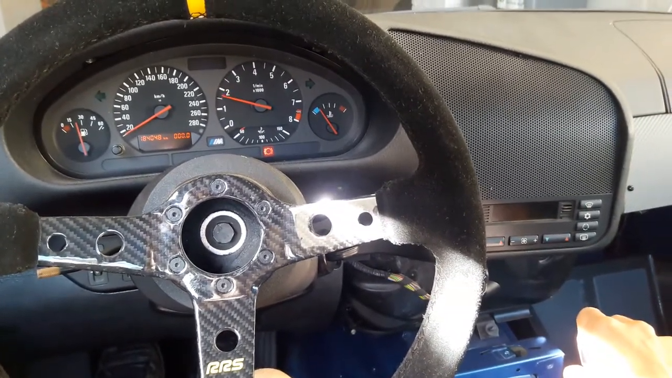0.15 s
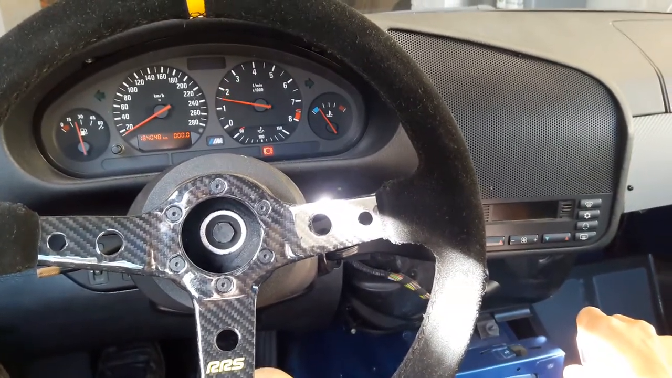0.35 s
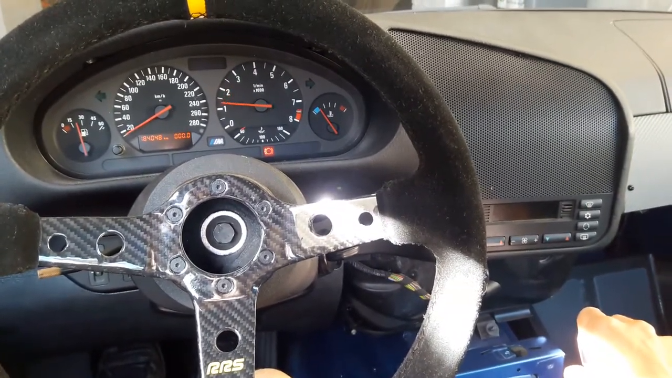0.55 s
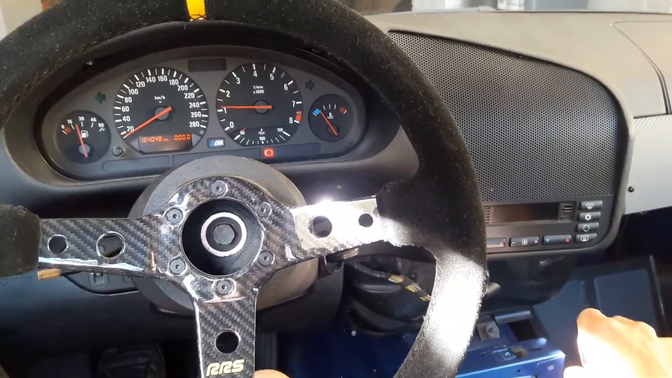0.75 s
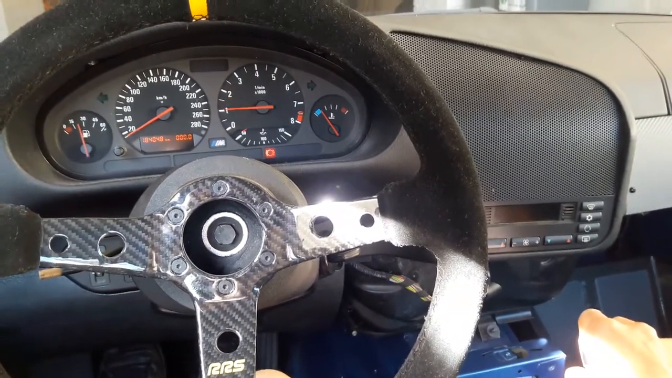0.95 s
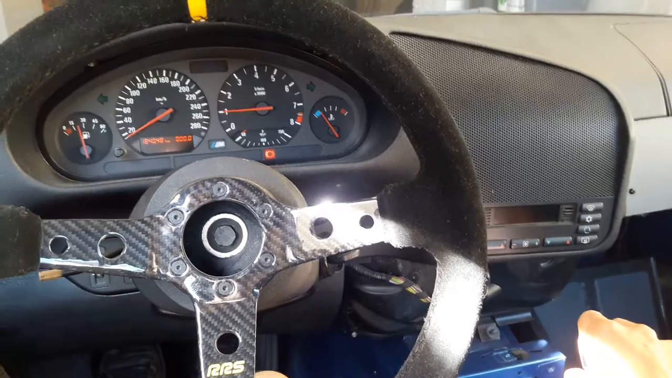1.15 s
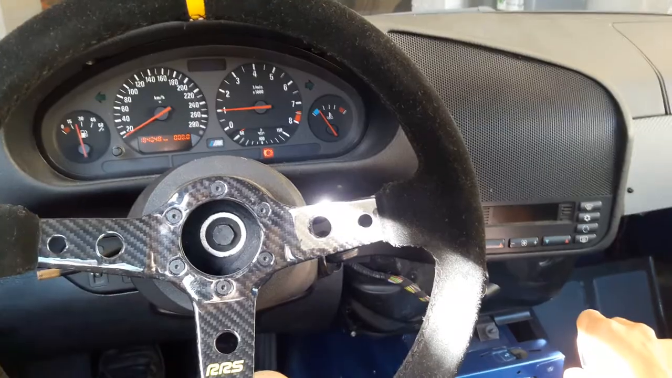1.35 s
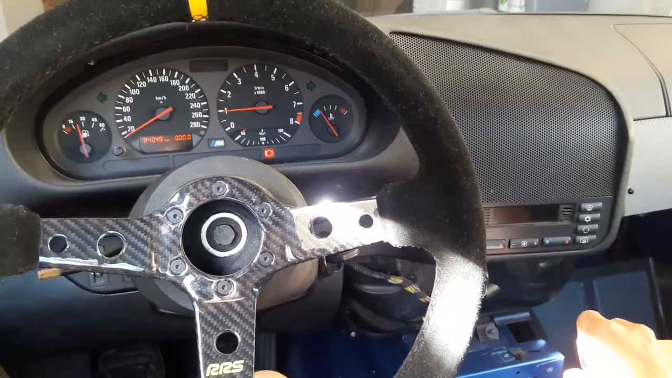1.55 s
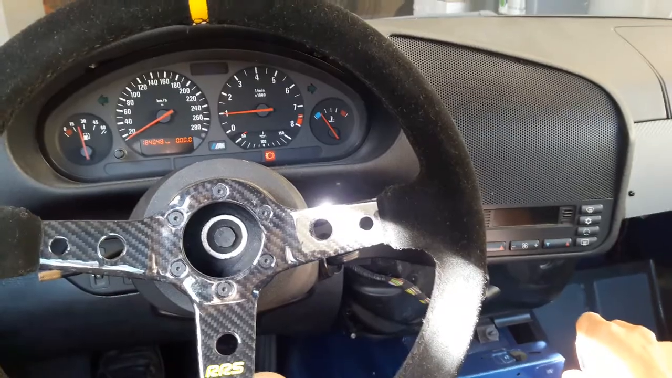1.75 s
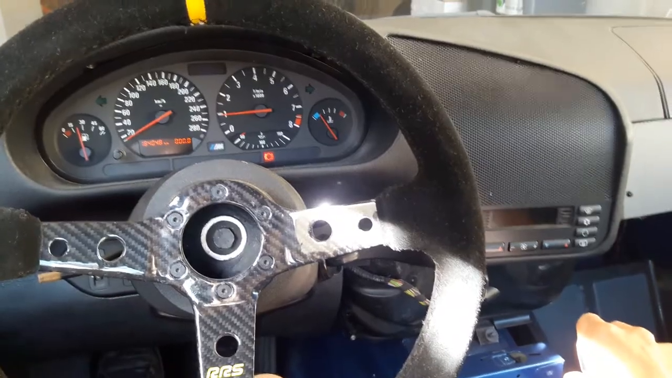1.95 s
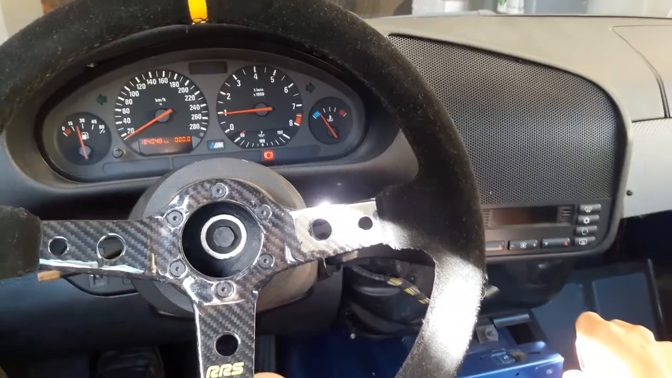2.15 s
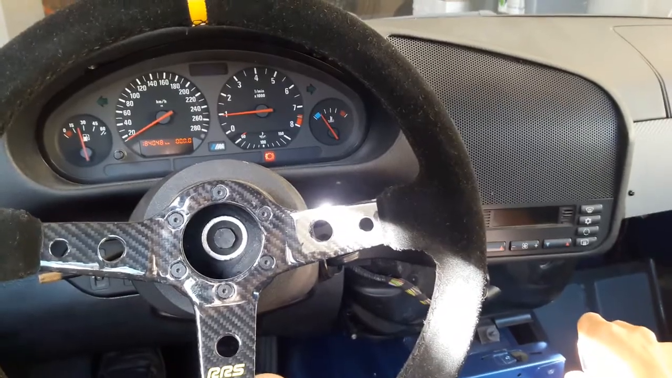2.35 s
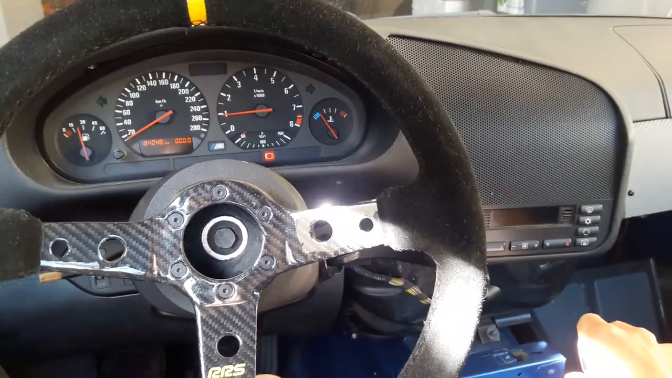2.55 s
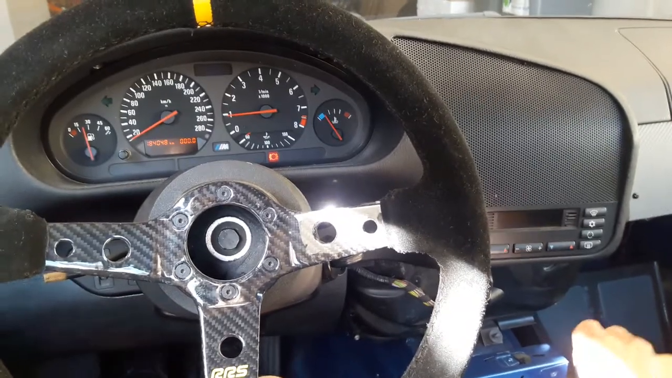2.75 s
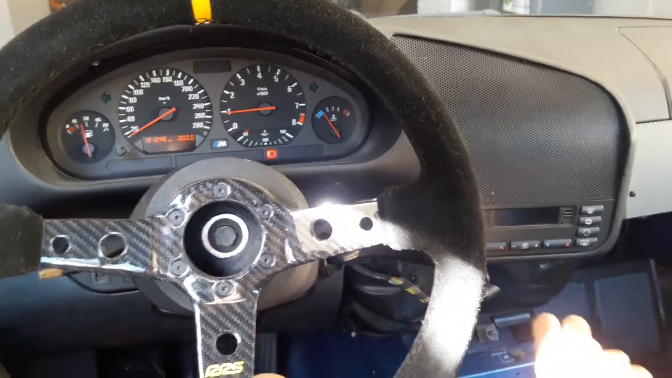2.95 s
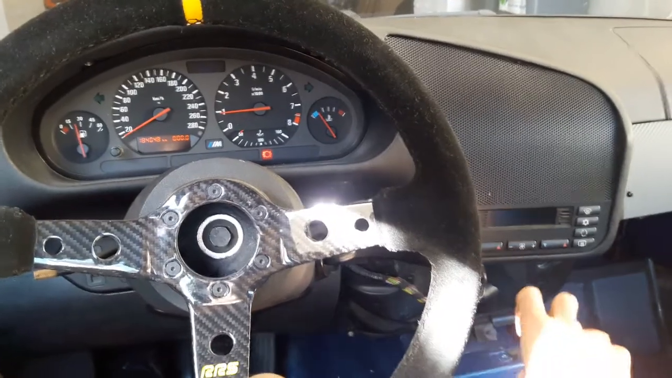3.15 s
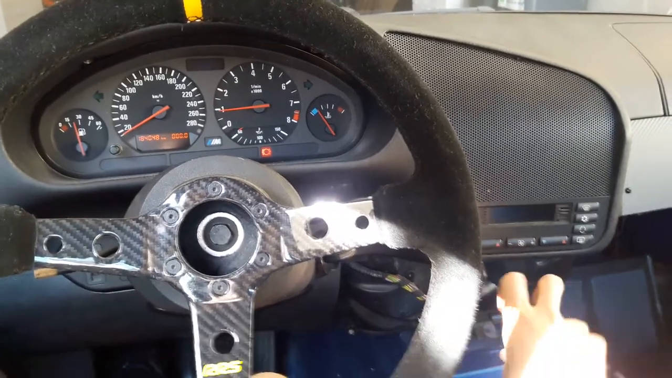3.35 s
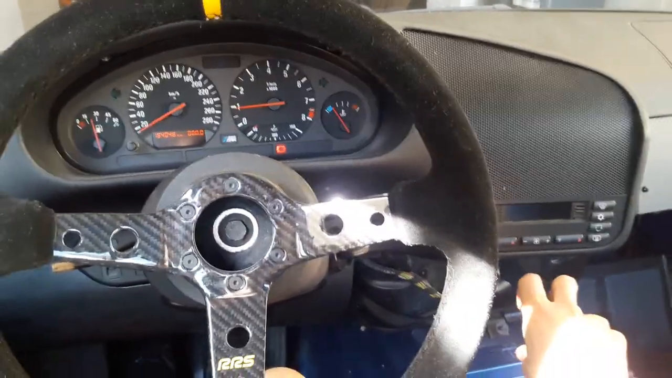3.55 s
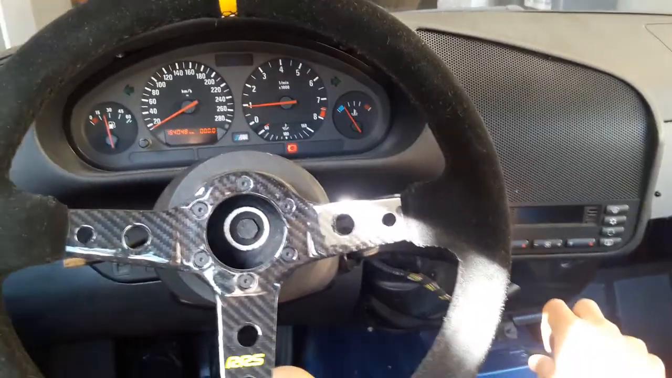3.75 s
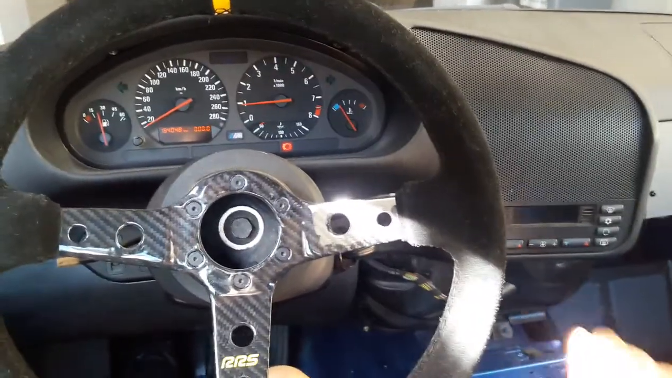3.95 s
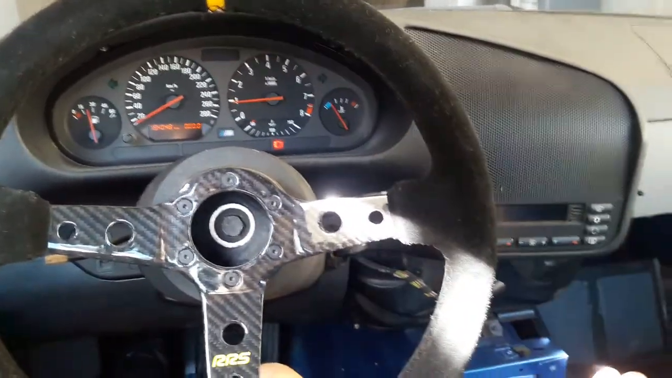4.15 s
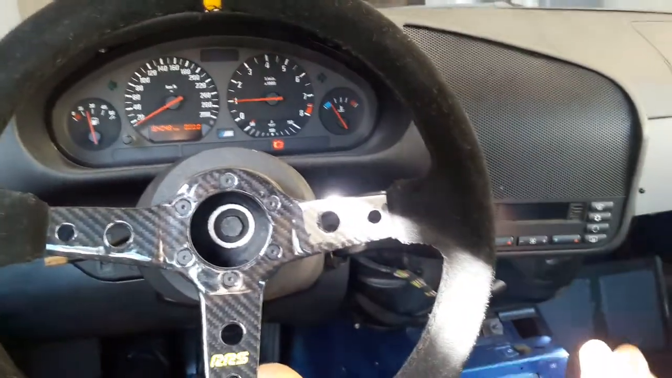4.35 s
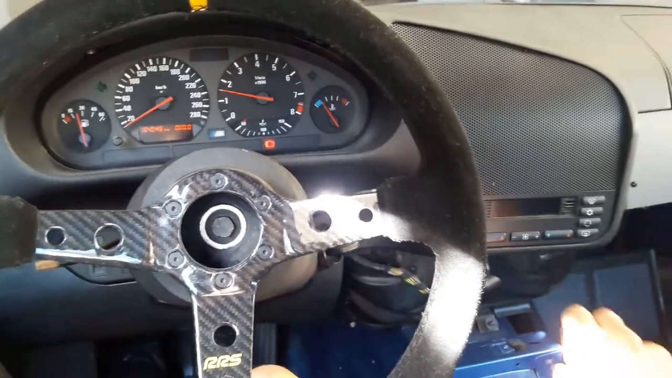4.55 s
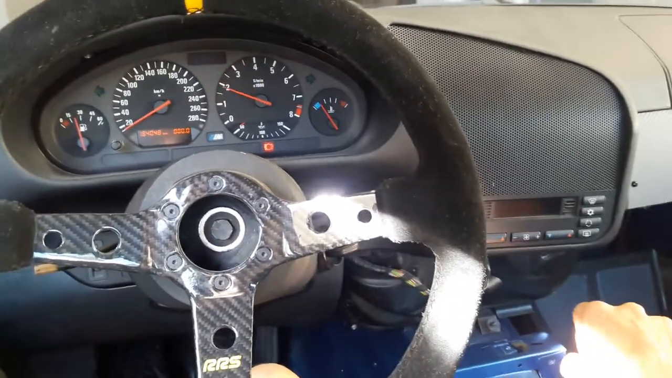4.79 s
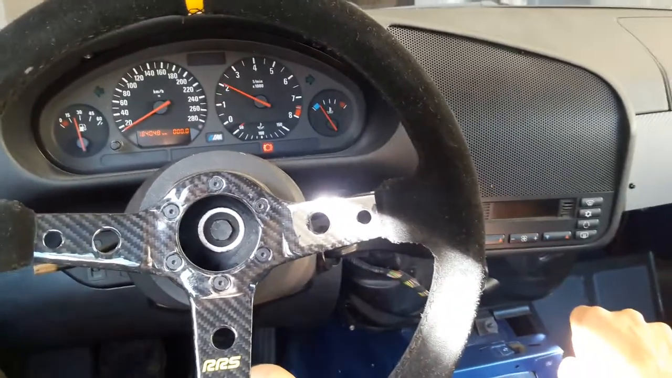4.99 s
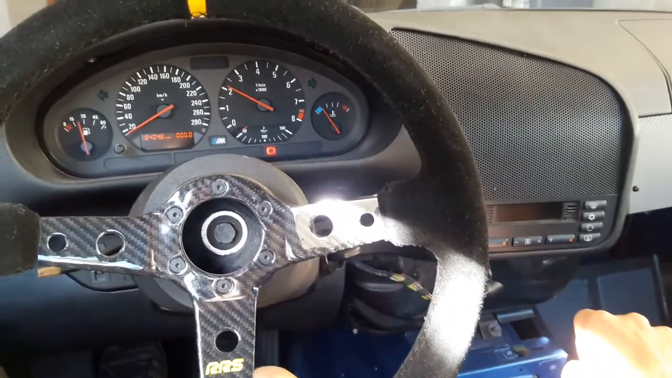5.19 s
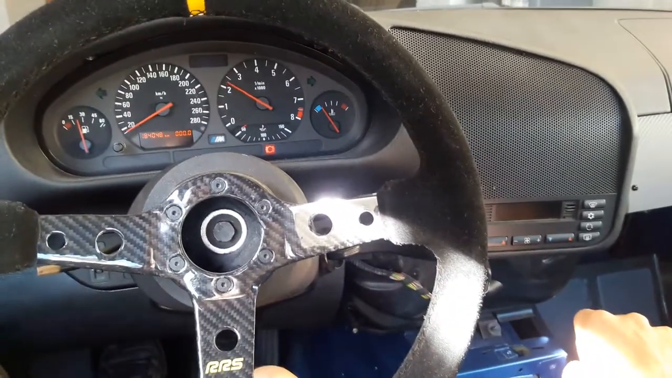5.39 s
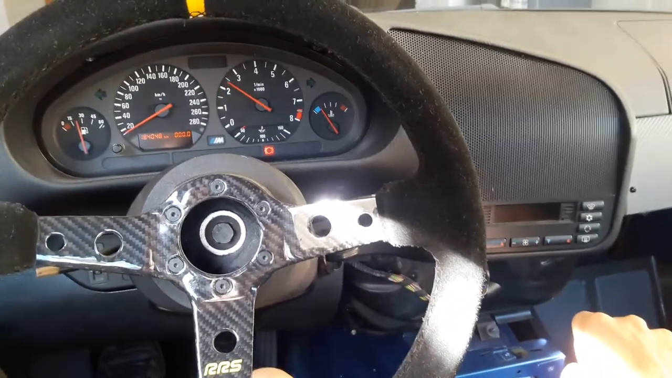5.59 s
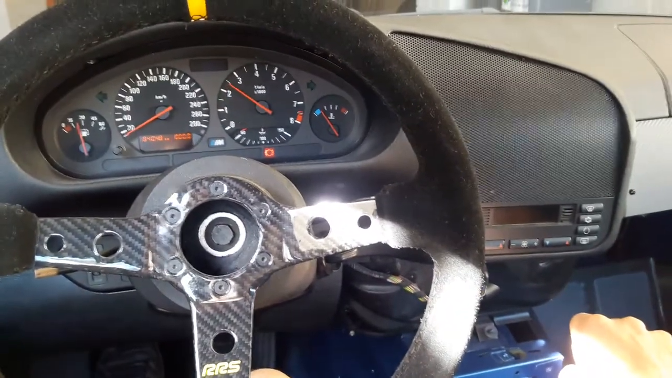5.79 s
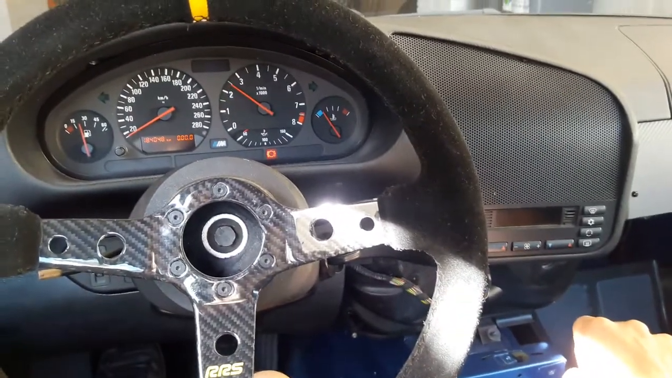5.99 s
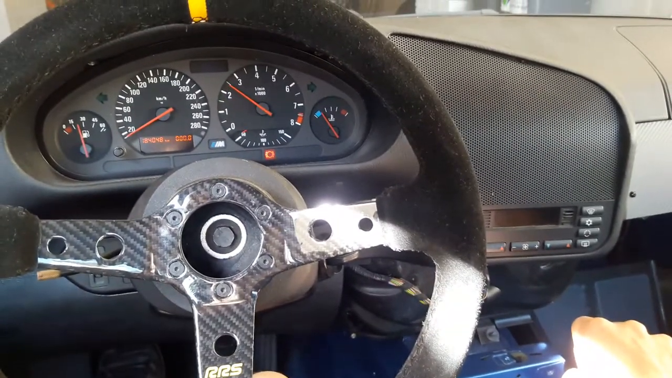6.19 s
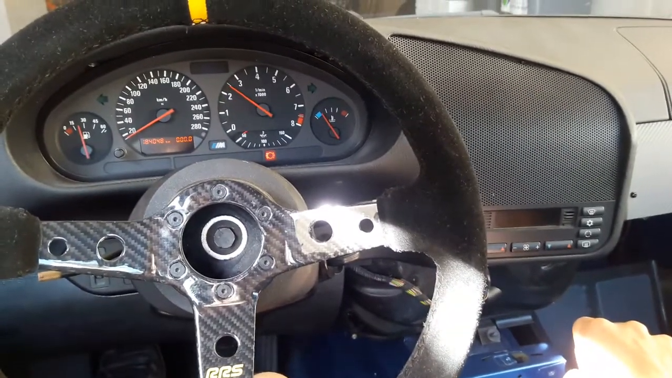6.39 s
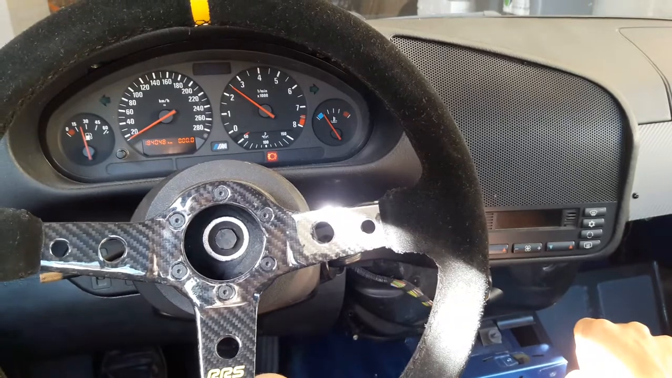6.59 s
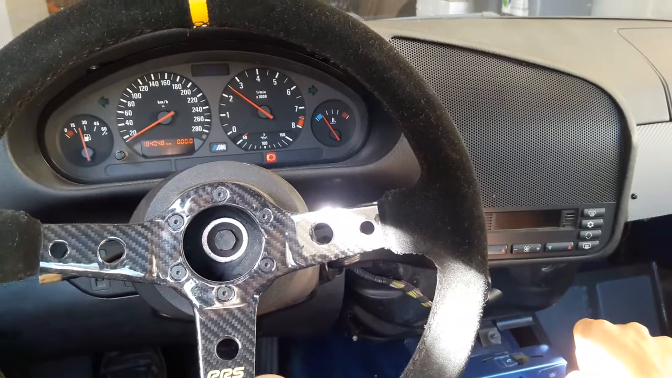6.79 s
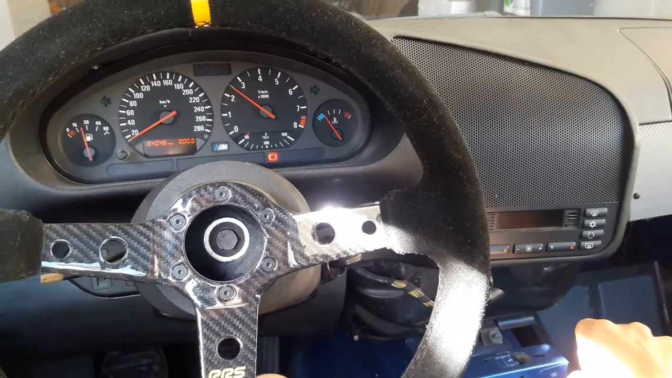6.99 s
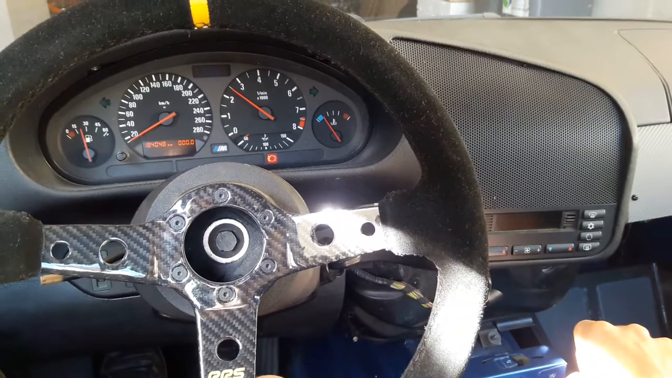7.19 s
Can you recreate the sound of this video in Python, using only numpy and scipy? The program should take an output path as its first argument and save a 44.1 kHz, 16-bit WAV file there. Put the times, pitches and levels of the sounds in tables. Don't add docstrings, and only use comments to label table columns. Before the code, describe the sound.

Heard from the driver's seat in a small, boomy cabin with a close stereo microphone. From 0 to about 0.8 seconds a six-cylinder petrol engine falls in revs, shuddering and missing beats, with low thumps ringing the floor pan. From 1 to 4.2 seconds it idles slowly, about 48 firings a second, lumpy and deep, with muffled rumble, clatter and a faint hissing puff each cycle from beyond the bulkhead, and thin gear and chain whine. Gear lever ticks come at 2.8 to 2.9, a heavy double clunk at 3.4, a light knock at 3.8 and a sharp click with clunk at 4.15. At 4.2 air gulps in, hard firings pound the floor and the revs climb steeply until 5, with small knocks and buzzes. They ease up to a loud, booming, slightly rough drone, nearly 130 firings a second, with brighter clatter and whine, held until 7.2 seconds.

```python
import sys
import numpy as np
from scipy import signal
from scipy.fft import rfft, irfft, next_fast_len
from scipy.io import wavfile
from scipy.ndimage import uniform_filter1d

SR = 44100
rng = np.random.default_rng(int(sys.argv[2]) if len(sys.argv) > 2 else 0)


def unload_wav(signal):
    wavfile.write(
        sys.argv[1],
        SR,
        np.round(np.clip(np.atleast_2d(signal).T, -1, 1) * 32767).astype(np.int16),
    )


def volts_from_db(level):
    exponent = np.asarray(level, float) / 20
    return 10 ** exponent


N = 318843

# t/s, effort over a resting idle/dB, extra unevenness between cylinders/dB
BURN = [(0, 4, 4.5), (.25, 7, -1.3), (.55, 3.5, 4), (.8, 3, 1.5), (1.6, 1.5, 0), (2.8, 1.7, -2.2),
        (3.6, -1.3, 6), (4.15, 0.5, 4), (4.3, 6.5, 0.5), (4.5, 8, -1), (4.6, 16.5, -3), (5.1, 16.5, -3),
        (5.35, 15, -0.1), (6.0, 14, 2), (6.4, 17, -4), (7.0, 14.5, -2.1), (7.23, 14.5, 1.5)]
HALF = np.array([[1], [-1]]) / 2


def unit(x):
    return x / np.sqrt(np.mean(x ** 2) + 1e-20)


def along(points, hz):
    f, v = np.transpose(points)
    return np.interp(np.log(hz + 1), np.log(f + 1), v)


def curves(rows):
    s, *cols = np.transpose(rows)
    return [np.interp(np.arange(N) / SR, s, c) for c in cols]


def wobble(rate, size=1):
    knots = rng.standard_normal(int(N * 40 / SR) + 4)
    return np.interp(np.arange(0, N, size) * min(rate, 40) / SR, np.arange(len(knots)), knots)


def span(start, end, edge):
    t = np.arange(N) / SR
    return np.clip(np.minimum(t - start, end - t) / edge + .5, 0, 1)


def filtered(x, response):
    m = 2 * next_fast_len(N // 2 + SR // 2)
    return irfft(rfft(x, m) * response(np.fft.rfftfreq(m, 1 / SR)), m)[..., :N]


def rush(spectrum, patchy_db):
    # f/Hz, likeness of the two ports (0-1)
    alike = [(100, 1), (250, 0.4), (400, 0.5), (700, 0.02), (1300, 0.74), (2000, 0.14), (3000, .12),
             (10000, 0.02)]
    # f/Hz, phase by which the left port leads/rad
    lead = [(0, 0), (860, -0.2), (1380, 3.3), (2070, 3.1), (2760, 6.7), (3270, 5.6), (3880, 8.6),
            (4910, 10.0), (7410, 18.6), (8610, 18.8), (11700, 24.9), (12300, 24.8), (13500, 33.7),
            (15200, 52.6)]
    z = signal.stft(rng.standard_normal((2, N)), nperseg=512)[2]
    field = uniform_filter1d(rng.standard_normal(z.shape[1:]), size=5, axis=0)
    field = uniform_filter1d(field, size=10, axis=1)
    pair = signal.istft(z * volts_from_db(patchy_db * unit(field)), nperseg=512)[1][:, :N]

    def mid_side(hz):
        turn = np.arccos(np.clip(along(alike, hz), -1, 1)) / 2
        return volts_from_db(along(spectrum, hz)) * [np.cos(turn), np.sin(turn)]

    def left_first(hz):
        return np.exp(1j * HALF * np.interp(hz, *np.transpose(lead)))

    mid, side = filtered(pair, mid_side)
    return unit(filtered(np.array([mid + side, mid - side]), left_first))


def crank():
    # t/s, engine cycle rate/Hz
    speed = [(0, 14.58), (.4, 11.92), (.6, 10.31), (.9, 8.77), (1.6, 8.24), (2.0, 8.17), (2.4, 8.0),
             (3.0, 7.99), (3.3, 7.86), (4.2, 7.81), (4.3, 8.4), (4.6, 14.5), (4.9, 18.33), (5.1, 18.56),
             (5.4, 20.45), (5.8, 21.24), (6.8, 21.47), (7.23, 21.15)]
    idle_hz, held_hz = 8, 21.4
    cycle_hz = curves(speed)[0]
    load = np.clip((cycle_hz - idle_hz) / (held_hz - idle_hz), 0, 1)
    return cycle_hz, np.cumsum(cycle_hz) / SR, load


def pull(cycle_hz):
    gain = uniform_filter1d(np.gradient(cycle_hz) * SR, size=SR // 5)
    lingering = np.exp(-np.arange(N) / SR / 0.67)
    return np.clip(gain, 0, None), np.clip(-gain / 7, 0, 1) * lingering


def bay(cycle_hz, cycles, load):
    # f/Hz, level/dB
    rumble_band = [(25, -27.5), (55, -11), (90, -6), (145, 5.5), (220, -8.5), (320, -3), (600, -22.5),
                   (900, -60.5)]
    clatter_band = [(290, -36.5), (500, -4.5), (622, -11), (741, -10.5), (817, -7.5), (1020, -13.5),
                    (1180, -9.5), (1380, -7.5), (2380, -16.5), (3000, -21), (3270, -23), (6800, -38.5),
                    (8840, -72), (15000, -120)]
    hiss_band = [(6000, -30), (7200, -6), (8400, -8), (9100, -8), (10400, -3), (11700, 0), (13400, -4),
                 (15500, -6)]
    rumble_set = (-34.5, .5, 0.244, 5.5)
    clatter_set = (-43.5, 11.5, -0.0879, 3, 4.5)
    jolt_s, jolt_spread_s = 4.3, 0.14

    gain, overrun = pull(cycle_hz)
    effort_db = curves(BURN)[0]
    rumble_db = rumble_set[0] + rumble_set[1] * effort_db + rumble_set[2] * gain + rumble_set[3] * overrun
    clatter_db = clatter_set[0] + clatter_set[1] * load + clatter_set[2] * gain + clatter_set[3] * overrun
    clatter_db += clatter_set[4] * np.exp(-((np.arange(N) / SR - jolt_s) / jolt_spread_s) ** 2)
    hiss_db = -67 + 0.93 * (clatter_db + 43) + .35 * gain * load

    firing = np.cos(2 * np.pi * 6 * cycles)
    since = (cycles - .07) % 1
    puff = (1 - load) * since / .1 * np.exp(1 - since / .1)
    rumble_db = rumble_db + 1 + 2.8 * wobble(14)
    clatter_db = clatter_db + 4.5 + 0.31 * firing + 0.68 * puff + 0.38 * wobble(6.9)
    hiss_db = hiss_db + 6.5 * puff + .5 * wobble(20)

    rumble = volts_from_db(rumble_db) * rush(rumble_band, patchy_db=1.5)
    clatter = volts_from_db(clatter_db) * rush(clatter_band[:-2] + [(9000, -75.5)], patchy_db=1.0)
    hiss = volts_from_db(hiss_db) * rush(hiss_band, patchy_db=1)
    return rumble + clatter + hiss


def intake():
    # opens t/s, rise/s, eases t/s, release/s
    throttle = (4.2, 0.031, 5.6, .4)
    # shut/dB, first gulp/dB, open/dB, held/dB, gulp decay/s
    air = (-73, -49.5, -58.5, -66, .06)
    # f/Hz, level/dB
    throat = [(3500, -28), (5000, 1.5), (6000, 2), (6900, -6), (7600, -29.5)]
    opens, rise, eases, release = throttle
    shut_db, gulp_db, open_db, held_db, decay = air
    t = np.arange(N) / SR - opens
    flow_db = open_db + (gulp_db - open_db) * np.exp(-np.abs(t - rise) / decay)
    flow_db += (held_db - open_db) * np.clip((t + opens - eases) / release, 0, 1)
    level_db = shut_db + (flow_db - shut_db) * np.clip(t / rise, 0, 1)
    return volts_from_db(level_db) * rush(throat, patchy_db=3.5)


def gears(cycle_hz, cycles, load, size=3):
    # f/Hz, level/dB
    gearbox_case = [(465, -40), (488, -38), (515, -49), (880, -40.5), (1075, -40), (1190, -43.5),
                    (1215, -52.5), (1245, -45)]
    # f/Hz, level/dB
    chain_cover = [(900, -49.5), (935, -49), (970, -58), (1070, -44), (1230, -57), (2100, -54.5),
                   (2380, -50), (2450, -45.5)]
    teeth = [50, 54, 74, 76, 87.5, 95, 98, 101, 107, 122, 129, 133, 140.5, 152, 174, 189, 190, 228]
    # level at idle/dB, level revved/dB
    whine = [(-70, -52), (-70, -46), (-70, -49), (-60, -56), (-70, -47), (-75, -54), (-75, -52), (-75, -56),
             (-75, -55), (-75, -55), (-62, -49), (-75, -54), (-80, -58), (-70, -52), (-75, -58), (-80, -60),
             (-75, -57), (-80, -61)]
    mesh, chain = 58.2, 114.3
    engaged = 1 - span(2.85, 4.98, 0.077)
    damped_db = -12 * span(3.92, 4.9, .15)
    slow = [c[::size] for c in (cycle_hz, cycles, load, engaged, damped_db)]
    cycle_hz, cycles, load, engaged, damped_db = slow

    def flutter():
        return 2.5 * wobble(9, size)

    shake = .0022 * np.sin(2 * np.pi * cycles) * (1 - load) + .0004 * wobble(10, size)
    turn = 2 * np.pi * (cycles + shake)
    beat_db = 4 * (1 - load) * np.cos(2 * np.pi * cycles)
    out = volts_from_db(along(gearbox_case, mesh * cycle_hz) + flutter()) * engaged * np.sin(mesh * turn)
    chain_db = along(chain_cover, chain * cycle_hz) + damped_db + beat_db + 0.69 * flutter()
    out += volts_from_db(chain_db) * np.sin(chain * turn)
    for k, (idle_db, revved_db) in zip(teeth, whine):
        out += volts_from_db(idle_db + load * (revved_db - idle_db) + flutter()) * np.sin(k * turn)
    return signal.resample_poly(np.sqrt(2) * out, size, 1)[:N]


def lever():
    # t/s, level/dB, centre f/Hz, t60/s
    ticks = [(2.899, -32, 2210, 0.056), (4.147, -26.5, 1580, 0.074), (4.148, -51.5, 9950, .03)]
    knocks = [(2.828, -31, 1660, 0.15), (2.908, -31.5, 1320, 0.094), (3.8, -42, 1600, 0.079),
              (4.603, -35, 1480, 0.062), (4.679, -34, 2490, 0.05), (4.818, -36, 2960, .07)]
    clunks = [(3.408, -27.5, 800, 0.31), (3.425, -25, 820, 0.17), (3.445, -17, 523, 0.077),
              (3.459, -19.5, 500, 0.11), (3.482, -26, 460, 0.11), (4.152, -20, 600, .2)]
    thuds = [(3.43, -16.5, 309, 0.18), (3.828, -32, 1620, 0.12), (4.15, -36, 3020, 0.28)]
    buzzes = [(.016, -39, 2730, .3), (.33, -41.5, 2720, 0.17), (4.81, -37, 3340, 0.23),
              (4.9, -41, 2780, .6)]
    # width/octaves, rise/s
    kinds = [(.95, 0.00032), (0.67, 0.0026), (1, 0.0028), (0.092, 0.0036), (0.03, .012)]
    out, t = np.zeros((2, N + SR)), np.arange(SR // 4) / SR
    hz = np.fft.rfftfreq(len(t), 1 / SR) + 1
    for rows, (octaves, rise) in zip((ticks, knocks, clunks, thuds, buzzes), kinds):
        for s, db, centre_hz, t60 in rows:
            near, left, right = rng.standard_normal((3, len(t)))
            ports = near + .7 * np.array([left, right])
            band = np.exp(-.5 * (np.log2(hz / centre_hz) / octaves) ** 2) / np.sqrt(hz)
            burst = unit(irfft(rfft(ports) * band, len(t)))
            envelope = volts_from_db(db - 60 * t / t60) * (1 - np.exp(-t / rise))
            out[:, round(s * SR):][:, :len(t)] += burst * envelope
    return out[:, :N]


def kicks():
    # first t/s, end t/s, gap/s, first level/dB, loss per firing/dB
    runs = [(.019, .19, .071, -15.5, -1), (.225, .28, 0.039, -15, 1.5), (.49, .6, .0617, -14, -1),
            (4.2, 4.31, .085, -16.5, 1.5), (4.345, 4.46, .048, -4, 1), (4.584, 4.81, .0343, -11, -0.36),
            (4.858, 4.99, .0343, -11, -1), (5.01, 5.2, .0481, -9.5, 0.2)]
    # f/Hz, level/dB, t60/s
    floor_pan = [(143.6, 0, 0.24), (185, -7.5, 0.13), (265.5, -12.5, .1), (326.4, -9.5, .12),
                 (469.5, -16.5, 0.087)]
    out, t = np.zeros(N + SR), np.arange(SR // 2) / SR
    for first, end, gap, first_db, lost_db in runs:
        for k, s in enumerate(np.arange(first, end, gap)):
            ring = 0
            for hz, level_db, t60 in floor_pan:
                struck_db = level_db + rng.normal(0, 3.3)
                ring = ring + volts_from_db(struck_db - 60 * t / t60) * np.sin(2 * np.pi * hz * t)
            out[round(s * SR):][:len(t)] += volts_from_db(first_db - k * lost_db) * ring * (1 - np.exp(-t / .004))
    return out[:N]


def stumble():
    # t/s, dip/dB
    dips = [(.06, -7.5), (.14, -16), (.2, -9.5), (.47, -11), (.53, -4.5), (.62, -13), (0.699, -5),
            (4.33, -4.5), (4.43, -7.5), (4.571, -9.5), (4.839, -6)]
    half_s = 0.0085
    t = np.arange(N) / SR
    return volts_from_db(sum(db * np.exp(-((t - s) / half_s) ** 2) for s, db in dips))


def exhaust(cycle_hz, cycles, load, size=16):
    # multiple, at idle/dB, revved/dB
    order = [(2, 6.5, 0.5), (3, 3, -3.5), (4, 6.5, -5), (5, -17.5, -1.5), (6, 9, 8.5), (7, -2, -0.5),
             (8, -4, -2.5), (9, -15.5, 2.6), (10, 1, -18), (11, -1.5, 2.5), (12, 18, 9.5), (13, -3.5, 4.5),
             (14, 0, -22), (15, -10, 1.5), (16, -14, 9.5), (17, -2, -6), (18, 6, 12), (19, -2, 10),
             (20, -13, -17.5), (21, -39, 7), (22, -9.5, 8.5), (23, 4, -28), (24, 5, 16),
             (27, -7, 12.5), (28, 3.5, -3), (30, 12.5, -5), (36, 4, -3), (37, 3.5, 2), (38, 12.5, 20),
             (39, 6.5, 11.5), (42, 5, -28.5), (43, 7.5, -10)]
    # f/Hz, level/dB
    cabin = [(20, 5.5), (40, -10.5), (52, 15), (65, 17.5), (80, 6), (100, 3.5), (115, 11), (130, 15.5),
             (145, 22), (160, 3), (180, 5), (210, 0.8), (250, -7), (310, -0.2), (380, -12.5), (480, -10.5),
             (620, -25), (830, -16), (1000, -14.5)]
    strong = (.26, .87, .14)
    fill_db, top_order = (-3, -2.5), 44
    idle_burn_db = -50

    coast_db = -8.5 * pull(cycle_hz)[1]
    slow = [c[::size] for c in (cycle_hz, cycles, load, coast_db, *curves(BURN))]
    cycle_hz, cycles, load, coast_db, effort_db, uneven_db = slow
    angle = 2 * np.pi * (cycles - strong[0] - load * (strong[1] - strong[0]))
    listed = {round(k): db for k, *db in order}
    out = 0
    for k in range(2, top_order + 1):
        idle_db, revved_db = listed.get(k, fill_db)
        between = k % 6 > 0
        level_db = idle_db + load * (revved_db - idle_db) + between * uneven_db + (k > 30) * coast_db
        unsteady_db = .25 * np.sqrt(k) * wobble(6 + 6 * (k < 10), size) * (1 + between * (k < 10))
        scattered = k > 19 or 8 < k < 17 or k < 5
        lag = 2 * np.pi * (k * strong[2] * (k > 14) + rng.random() * scattered)
        boom_db = along(cabin, k * cycle_hz)
        out = out + volts_from_db(level_db + unsteady_db + boom_db) * np.cos(k * angle - lag)
    return signal.resample_poly(np.sqrt(2) * volts_from_db(idle_burn_db + effort_db) * out, size, 1)[:N]


def scene():
    motion = crank()
    background = bay(*motion) + intake() + gears(*motion)
    firings = (kicks() + exhaust(*motion)) * stumble()
    return background + lever() + firings


def band_limit(x):
    return signal.sosfilt(signal.butter(12, 15630, fs=SR, output="sos"), x)


def record(dry):
    # f/Hz, left minus right/dB
    lean = [(60, -3), (110, -3), (200, 0.5), (380, -2.5), (700, -3), (1290, 0), (2380, 3.5), (4400, -7),
            (8120, -2), (15000, 1.5)]

    def port_response(hz):
        return volts_from_db(HALF * along(lean, hz)) / np.sqrt(1 + (34 / (hz + 1)) ** 8)

    ports = filtered(dry, port_response)
    rounded = ports / (1 + np.abs(ports / .97) ** 6) ** (1 / 6)
    return band_limit(rounded)


dry = scene()
out = record(dry)
unload_wav(out)
```